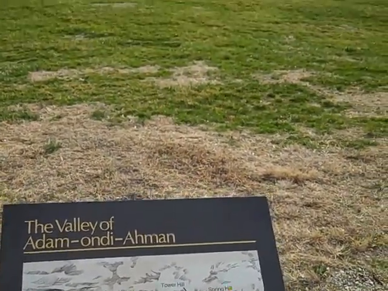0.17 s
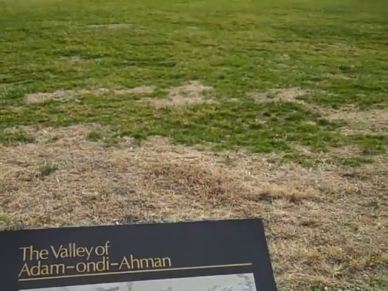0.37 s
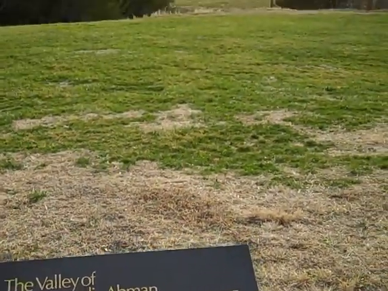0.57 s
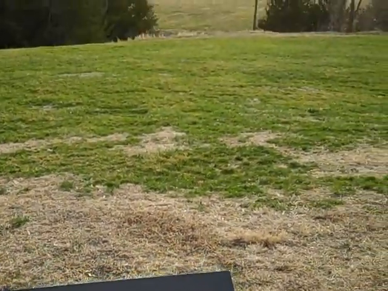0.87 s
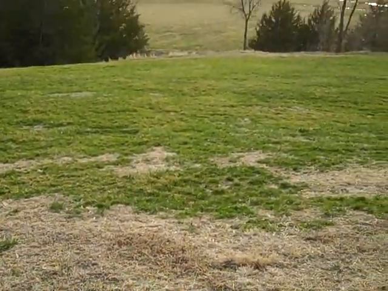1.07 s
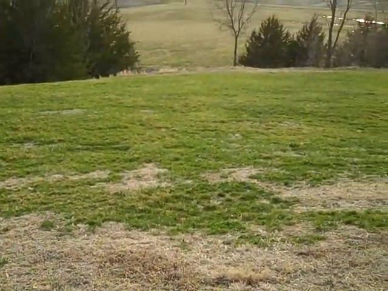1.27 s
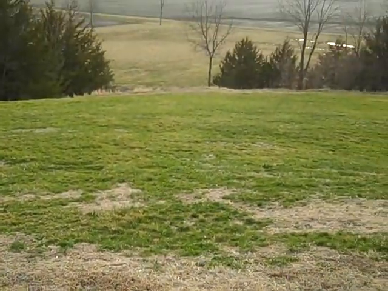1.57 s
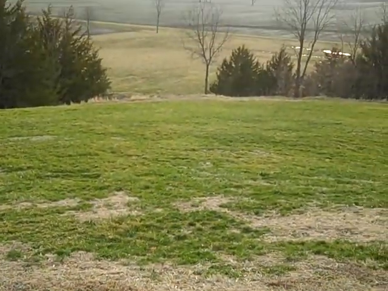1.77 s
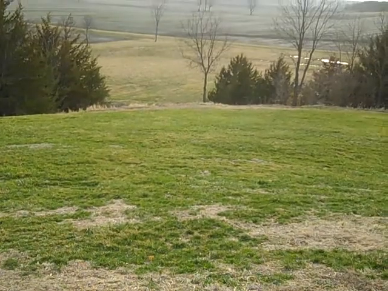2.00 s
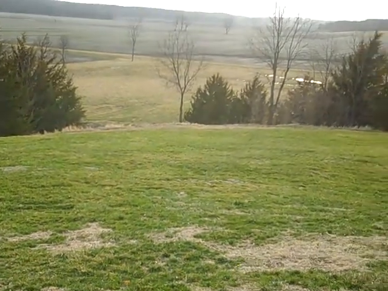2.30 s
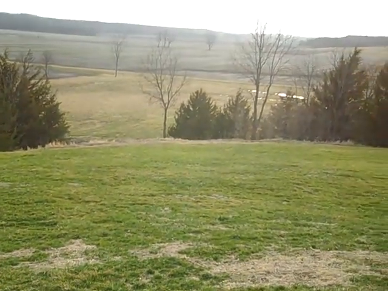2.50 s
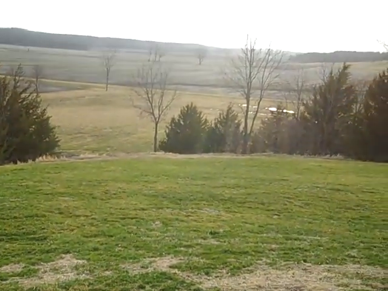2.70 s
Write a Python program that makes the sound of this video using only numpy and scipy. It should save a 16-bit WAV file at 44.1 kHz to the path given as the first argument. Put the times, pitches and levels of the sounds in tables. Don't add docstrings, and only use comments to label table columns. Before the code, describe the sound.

A crowd of small frogs trills shrilly without pause, strongest to the left, individual calls growing louder halfway through; low wind buffets the handheld microphone on the right, with tiny finger ticks, in an open grassy valley.

```python
import sys
import numpy as np
from scipy import signal
from scipy.fft import rfft, irfft
from scipy.io import wavfile
from scipy.ndimage import uniform_filter1d

SR = 44100
rng = np.random.default_rng(int(sys.argv[2]) if len(sys.argv) > 2 else 0)


def amp(db):
    return 10 ** (np.asarray(db, float) / 20)


def write(x):
    x = np.atleast_2d(x).T
    wavfile.write(sys.argv[1], SR, np.round(np.clip(x, -1, 1) * 32767).astype(np.int16))


N = 125685

# multiple_of_loud_pitch, level_db
SAC_PARTIALS = [(0.529, -25), (1.003, -1), (1.547, -27.5), (2, -40)]
# start_s, level_db, pitch_shift_hz
CROWD_WAVES = [
    (0, -43.5, 1),
    (.65, -42.5, 28),
    (1.12, -43.5, -29),
    (1.55, -41.5, 57),
    (1.8, -41, -40),
    (2.05, -38.5, 3),
    (2.4, -41, -23),
    (2.85, -41.5, 29),
]
# start_s, peak_db, pitch_hz
EARLY_PULSES = [(0.0456, -31, 3360), (0.1315, -27.5, 3260), (0.2379, -29.5, 3200), (0.2666, -31, 3060),
                (0.283, -39, 3120), (0.2977, -25, 3130), (0.3334, -38, 3040), (0.3945, -35, 3280),
                (0.4332, -34, 3430), (0.485, -29, 3270), (0.6024, -31, 3180), (0.7048, -27, 3510),
                (0.7244, -35, 3070), (0.745, -24, 3120), (0.7783, -26, 3150), (0.8684, -25, 3350),
                (0.8982, -28, 3430), (0.9347, -28, 3380), (0.9542, -35, 3130), (1.0038, -28, 3280),
                (1.0278, -29.5, 3250), (1.047, -31.5, 2900), (1.0794, -26.5, 2990), (1.1083, -27, 2950),
                (1.1481, -29, 3030), (1.2116, -29, 3000), (1.254, -32, 3220), (1.312, -26, 3320),
                (1.3309, -30.5, 3160), (1.3717, -25, 3320)]
# start_s, peak_db, pitch_hz
LATE_PULSES = [(1.4193, -22.5, 3190), (1.444, -32, 3240), (1.4648, -20.5, 3220), (1.4981, -24, 3400),
               (1.5102, -22.5, 3300), (1.541, -22, 3430), (1.5557, -25.5, 3170), (1.5899, -25, 3350),
               (1.6081, -25, 3200), (1.6414, -25.5, 3380), (1.6612, -30, 3050), (1.7041, -29, 3230),
               (1.7336, -27, 3080), (1.7559, -25.5, 3380), (1.7995, -25, 3120), (1.8217, -27, 3200),
               (1.8337, -27.5, 3030), (1.8607, -24, 3170), (1.892, -29, 3030), (1.9257, -28.5, 3130),
               (1.9486, -22, 3150), (1.969, -28.5, 3120), (1.9919, -26, 3130), (2.0336, -24, 3180),
               (2.0713, -23, 3250), (2.0885, -29, 3190), (2.1399, -29, 3280), (2.1538, -25, 3220),
               (2.1846, -23.5, 3340), (2.214, -25.5, 3400), (2.247, -23.5, 3260), (2.2714, -30, 3370),
               (2.3043, -31, 3060), (2.3506, -31, 3040), (2.3796, -40, 3150), (2.3945, -26, 3380),
               (2.4212, -33, 3050), (2.447, -27, 3140), (2.4776, -36, 3060), (2.5272, -27, 2990),
               (2.548, -29, 3580), (2.5699, -29, 3060), (2.5971, -30.5, 3410), (2.6086, -24, 3000),
               (2.6437, -28, 3400), (2.667, -34, 3140), (2.6897, -28, 3150), (2.7333, -24, 3120),
               (2.7807, -35, 3080), (2.8371, -29, 3650)]
# frequency_hz, level_db_per_hz
VALLEY_TONE = [(18, -33), (30, -2.5), (71, -2), (174, -2.5), (908, -11), (1730, -10.5), (2030, -17.5),
               (2400, -19.5), (3120, -54), (5280, -120)]
# frequency_hz, level_db_per_hz
HISS_TONE = [(2470, -18), (4200, -1.5), (4960, -4.5), (5530, -9.5), (5910, -7), (7910, -5), (11200, -16),
             (13600, -15), (14500, -17)]
# frequency_hz, level_db_per_hz
FAINT_TONE = [(2400, -1), (4200, -9.0)]
# frequency_hz, likeness_0_to_1
PORT_LIKENESS = [(60, 0.5), (250, 0.86), (600, 0.92), (1200, 0.69), (2200, 0.13), (5000, 0.47),
                 (12000, 0.058)]
# frequency_hz, left_minus_right_db
STEREO_LEAN = [(250, 2), (1500, -1), (3000, 9), (5000, 7.5), (8000, 3.5), (12000, -0.5)]
# time_s, level_db
WIND_LEVEL = [(0, -53.5), (.3, -52), (.5, -40.5), (.7, -44), (.86, -51), (.95, -38.5), (1.07, -44),
              (1.22, -40.5), (1.32, -39.5), (1.42, -39.5), (1.65, -42), (1.86, -55), (2.59, -45),
              (2.85, -51)]
# frequency_hz, level_db_per_hz
WIND_TONE = [(12, -44), (20, -7.5), (62, -8), (81, -6.5), (151, -10), (397, -34.5), (600, -37), (780, -65),
             (1320, -120)]
# start_s, peak_db, wide_edge_db, length_s
TICKS = [(.137, -56, -13, .0015), (0.241, -47, 2, 0.0013), (0.246, -55, -1, .003),
         (0.287, -50.5, -22, 0.0021), (0.293, -52.5, -18, 0.00088), (0.384, -70, -24, .002),
         (0.4142, -39, -25, 0.00094), (0.417, -48, -3, .001), (0.419, -34.5, -16, 0.00056),
         (.42, -41, -12, 0.0013), (.424, -57, -16, .002), (0.435, -49, -21, 0.00092),
         (0.481, -53, -22, .001), (0.8185, -47, -4, 0.0017), (1.079, -55, -34, 0.0056),
         (1.8316, -50, -20, .001), (1.84, -50.5, -5, 0.009), (1.848, -44.5, -8, 0.0017),
         (1.853, -51, -20, 0.00092), (2.1385, -53, -14, .001), (2.146, -50, -8, 0.0011),
         (2.278, -37.5, -18, 0.0012), (2.285, -50, -14, 0.00073), (2.3865, -43.5, -9, 0.00065),
         (2.4224, -40, -20, 0.0016), (2.425, -51, -29, 0.006), (2.677, -51.5, -6, 0.0014),
         (2.838, -55, -18, .0015)]
# frequency_hz, width_hz, level_db
SHELL_MODES = [(4580, 700, -8), (6630, 71, 0.5), (7720, 750, 3.5), (9600, 280, -4)]
# start_s, peak_db, pitch_hz
BUFFETS = [(0.201, -49, 80), (0.315, -35, 139), (0.461, -34, 75), (0.522, -18, 81), (0.574, -29, 153),
           (0.655, -29.5, 127), (0.917, -31.5, 51.4), (0.959, -37, 75.5), (.995, -37.5, 102),
           (1.104, -29.5, 86), (1.183, -28.5, 68.3), (1.224, -35, 152.5), (1.348, -31, 114),
           (1.427, -29.5, 124), (1.484, -37, 176), (1.517, -30.5, 65), (1.6, -33, 88.6),
           (1.651, -36.5, 120), (2.099, -40.5, 53), (2.407, -45, 107.4)]
# centre_s, peak_db, pitch_hz, half_length_s
KNOCKS = [
    (0.647, -47, 1740, 0.0032),
    (1.1745, -32, 1420, 0.00085),
    (1.214, -48, 1570, 0.0017),
    (1.242, -44, 1600, 0.0024),
    (1.61, -48.5, 1480, 0.0025),
    (1.832, -39.5, 1390, 0.0017),
    (1.839, -38, 1290, 0.0021),
    (2.214, -32, 1450, 0.00044),
    (2.387, -43.5, 1400, 0.0019),
]

PORT_LAG_S = -0.000097
PULSE_FALL_S = 0.0025


def evened(x):
    return x / np.sqrt(np.mean(x ** 2) + 1e-20)


def read(points, hz):
    f, value = np.transpose(points)
    return np.interp(np.log(hz + 1), np.log(f + 1), value)


def curve(points):
    s, db = np.transpose(points)
    return amp(np.interp(np.arange(N) / SR, s, db))


def add(mix, start_s, sound):
    part = mix[:, round(start_s * SR):][:, :sound.shape[1]]
    part += sound[:, :part.shape[1]]


def noise(tone, likeness, patchy_db, flicker_db):
    frames, hz = N // 256 + 5, np.fft.rfftfreq(1024, 1 / SR)
    a, b, c, d, patches = rng.standard_normal((frames, 513, 5)).T
    patches = uniform_filter1d(patches, size=10, axis=0)
    patches = evened(uniform_filter1d(patches, size=8, axis=1))
    flicker = evened(uniform_filter1d(rng.standard_normal(frames), size=4))

    same = np.clip(likeness * read(PORT_LIKENESS, hz), 0, 1)[:, None]
    right = a + 1j * b
    own = c + 1j * d
    lag = np.exp(-2j * np.pi * hz * PORT_LAG_S)[:, None]
    left = same * lag * right + np.sqrt(1 - same ** 2) * own

    inside = (hz >= tone[0][0]) & (hz <= tone[-1][0])
    level_db = read(tone, hz)[:, None] + patchy_db * patches + flicker_db * flicker
    lean = amp(read(STEREO_LEAN, hz) * [[.5], [-.5]])[:, :, None]
    spectrum = np.array([left, right]) * amp(level_db) * inside[:, None] * lean
    return evened(signal.istft(spectrum, nperseg=1024, noverlap=768)[1][:, :N])


def trill(start_s, length_s, level_db, first_hz, pulses_per_s, lag_s, draw, swell_db, jitter_db):
    climb_hz_per_s = 560
    t = np.arange(0, length_s, 1 / pulses_per_s)
    draw = draw[:len(t)]
    db = level_db + swell_db * (2 * t / length_s - 1) ** 2 + jitter_db * draw[:, 0]
    hz = first_hz + climb_hz_per_s * t + 25 * draw[:, 1]
    return np.array([start_s + t, amp(db), hz, lag_s + 0 * t, np.pi * draw[:, 2]]).T


def sing(pulses, fall_s):
    rise_s, sag = .0011, 0.013
    left_db, right_db = 1, -6
    audible = (pulses[:, 0] > 0) & (pulses[:, 0] < N / SR)
    s, gain, hz, lag, phase = pulses[audible].T[:, :, None]
    n = np.arange(600)
    t = (n / SR - 2.5 * rise_s).astype(np.float32)
    shape = np.where(t < 0, np.exp(-(t / rise_s) ** 2), 1 / np.cosh(t / fall_s * 1.71))
    sagged_t = t - sag * t ** 2 / (4 * fall_s)
    turn = (2 * np.pi * hz * sagged_t + phase).astype(np.float32)
    partials = sum(np.float32(amp(db)) * np.sin(np.float32(k) * turn) for k, db in SAC_PARTIALS)
    wave = (partials * shape * gain).ravel()

    ports = []
    for late in (lag, -lag):
        at = np.round(np.maximum(s + late / 2, 0) * SR).astype(int) + n
        ports.append(np.bincount(at.ravel(), wave, N + 2000)[:N])
    return amp([[left_db], [right_db]]) * ports


def scatter(x):
    level_db, t60_s, drift_hz = -9.5, 0.034, 3
    t, out = np.arange(SR // 8) / SR, x.copy()
    tails = rng.standard_normal((3, 2, len(t))) * amp(-60 * t / t60_s) * (t > .002)
    for k, tail in enumerate(tails):
        turn = 2 * np.pi * drift_hz * np.arange(N) / SR + k * np.pi / 3
        share = np.sqrt(2 / 3) * np.cos(turn)
        smear = signal.oaconvolve(x * share, tail / np.linalg.norm(tail[0]), axes=1)
        out += amp(level_db) * smear[:, :N]
    return out


def crowd():
    frogs, call_s, rest_s, pulses_per_s = 110, .75, .45, 23
    pitch_hz, spread_hz, spread_db, port_spread_s = 3011, 140, 2.5, .0004
    yield_db, yield_s, trim_db = -6, .005, 2
    rows = []
    for k in range(frogs):
        size, far, pace, place = np.clip(rng.standard_normal(4), -1.7, 1.7)
        draw = rng.standard_normal((4, 40, 3))
        for turn in range(4):
            start_s = (turn - 1 + k / frogs) * (call_s + rest_s) + .05 * draw[turn, -1, 0]
            rows.append(trill(start_s, call_s, spread_db * far, pitch_hz + spread_hz * size,
                              pulses_per_s * (1 + .06 * pace), port_spread_s * place, draw[turn],
                              swell_db=-3, jitter_db=2))
    pulses = np.vstack(rows)
    s, db, shift_hz = np.transpose(CROWD_WAVES)
    pulses[:, 2] += np.interp(pulses[:, 0], s, shift_hz)

    strong_s = np.transpose(EARLY_PULSES + LATE_PULSES)[0]
    apart_s = np.abs(pulses[:, :1] - strong_s + yield_s / 2).min(axis=1)
    pulses[:, 1] *= amp(yield_db * np.exp(-(apart_s / yield_s) ** 2))
    return amp(trim_db) * curve(list(zip(s, db))) * evened(sing(pulses, PULSE_FALL_S))


def valley():
    drone_db, drone_fall_s = 3.5, .12
    drone = amp(drone_db * np.exp(-np.arange(N) / SR / drone_fall_s))
    hum = amp(-49) * drone * noise(VALLEY_TONE, likeness=1, patchy_db=0.69, flicker_db=0.16)
    hiss = amp(-60.5) * noise(HISS_TONE, likeness=0.36, patchy_db=1.5, flicker_db=1.0)
    faint = amp(-65.0) * noise(FAINT_TONE, likeness=0.6, patchy_db=0.57, flicker_db=0.24)
    return hum + hiss + faint


def wind_rumble():
    left_db, right_db = -6, 5
    rumble = noise(WIND_TONE, likeness=0, patchy_db=0.36, flicker_db=1.5)
    return rumble * curve(WIND_LEVEL) * amp([[left_db], [right_db]])


def near_frogs():
    trim_db, lead_s, fall_s, ringer_fall_s = 1, 0.001197, .0027, .011
    s, db, hz = np.transpose(EARLY_PULSES + LATE_PULSES)
    draw = rng.standard_normal((len(s), 3))
    lag_s = PORT_LAG_S * (1 + 0.4 * draw[:, 0])
    pulses = np.array([s - lead_s, amp(db + trim_db), hz, lag_s, np.pi * draw[:, 1]]).T
    rasp = trill(start_s=1.4155, length_s=.18, level_db=-41, first_hz=5380, pulses_per_s=21.4,
                 lag_s=PORT_LAG_S, draw=draw, swell_db=-1.5, jitter_db=1.5)
    ringer = trill(start_s=1.921, length_s=.2, level_db=-28, first_hz=3110, pulses_per_s=27.2,
                   lag_s=PORT_LAG_S, draw=draw, swell_db=-1.5, jitter_db=1.5)
    return sing(pulses, fall_s) + sing(rasp, PULSE_FALL_S) + sing(ringer, ringer_fall_s)


def ticks():
    trim_db, pan_db, rise_s, tail_db, tail_s = 3, 3, .0005, -21, .008
    top_hz, top_width_hz = 9300, 6200
    out, t = np.zeros((2, N)), np.arange(2600) / SR
    hz = np.fft.rfftfreq(len(t), 1 / SR)
    modes = sum(amp(db) * np.exp(-((hz - f) / width) ** 2) for f, width, db in SHELL_MODES)
    wide_edge = np.exp(-((hz - top_hz) / top_width_hz) ** 4)
    late = np.maximum(t - rise_s, 0)
    rise = np.sin(np.pi / 2 * np.minimum(t / rise_s, 1)) ** 2
    tail = amp(tail_db) * np.exp(-late / tail_s)
    pan = amp([[pan_db / 2], [-pan_db / 2]])
    for s, db, edge_db, length_s in TICKS:
        push = rng.standard_normal((2, len(t)))
        push = np.array([push[0], .9 * push[1] - .4 * push[0]])
        burst = irfft(rfft(push) * (modes + amp(edge_db) * wide_edge), len(t))
        shape = rise * (np.exp(-(late / max(length_s, 1e-4)) ** 2) + tail)
        add(out, s, amp(db + trim_db) * pan * evened(burst) * shape)
    return out


def buffets():
    rise_s, fall_s, snap_s = 0.02525, 0.013, 0.0016
    trim_db, left_db = 2, -24
    out, t = np.zeros((2, N)), np.arange(-3000, 3000) / SR
    shape = np.exp(-np.abs(t / np.where(t < 0, rise_s, fall_s)) ** 1.2)
    snap = (1 - (t / snap_s) ** 2) * np.exp(-(t / snap_s) ** 2 / 2)
    phases = rng.uniform(-1.47, 1, (len(BUFFETS), 2))
    for (s, db, hz), phase in zip(BUFFETS, phases):
        glide = 1 + 4 * phase[0] * t
        wave = np.cos(2 * np.pi * hz * t * glide + phase[:, None]) + snap
        add(out, s + rise_s - 3000 / SR, amp(db + trim_db) * amp([[left_db], [0]]) * shape * wave)
    return out


def knocks():
    out, t = np.zeros((2, N)), np.arange(-700, 700) / SR
    for s, db, hz, half_s in KNOCKS:
        tap = np.exp(-(t / half_s) ** 2) * np.cos(2 * np.pi * hz * t)
        add(out, s - 700 / SR, amp(db) * amp([[-1.5], [1.5]]) * tap)
    return out


def scene():
    frogs = scatter(crowd() + near_frogs())
    wind = wind_rumble() + buffets()
    handling = ticks() + knocks()
    return frogs + valley() + wind + handling


def band_limit(x):
    return signal.sosfilt(signal.butter(12, 14960, fs=SR, output="sos"), x)


def record(dry):
    edge = signal.firwin(401, 14230, window=("kaiser", 9), fs=SR)
    mix = signal.oaconvolve(dry, edge[None], "same")
    return band_limit(mix)


dry = scene()
out = record(dry)
write(out)
```